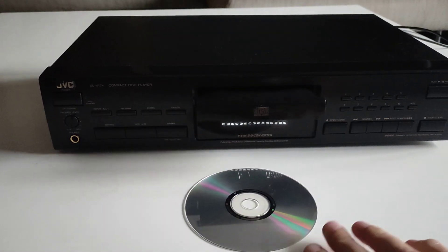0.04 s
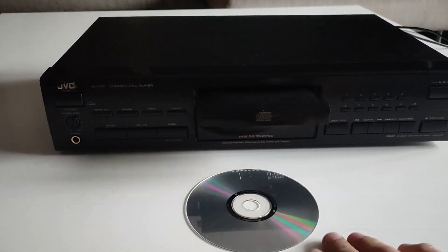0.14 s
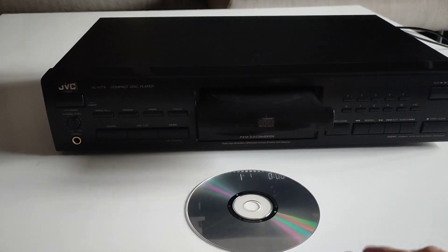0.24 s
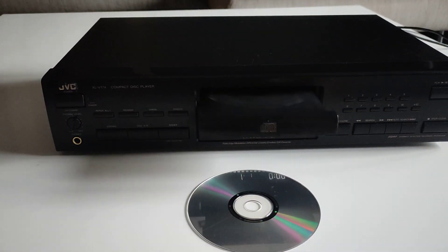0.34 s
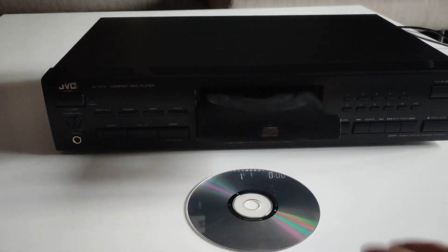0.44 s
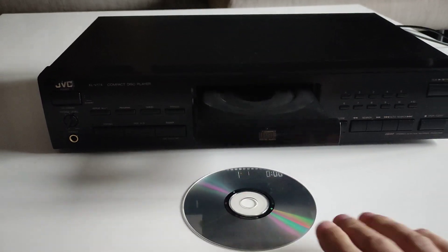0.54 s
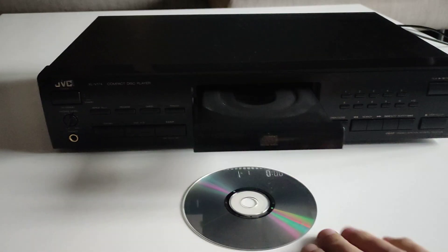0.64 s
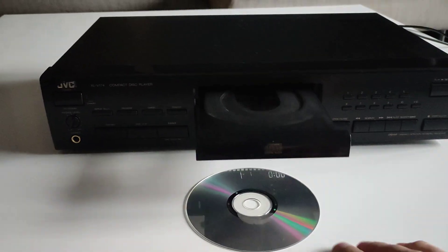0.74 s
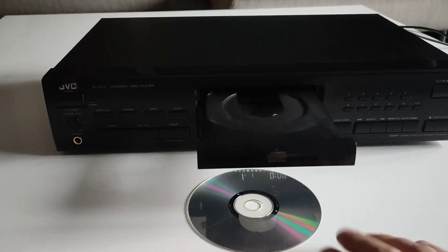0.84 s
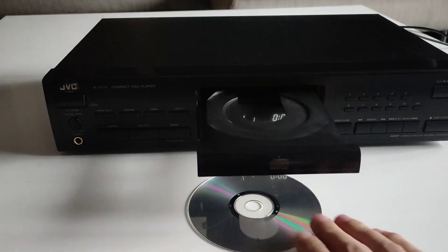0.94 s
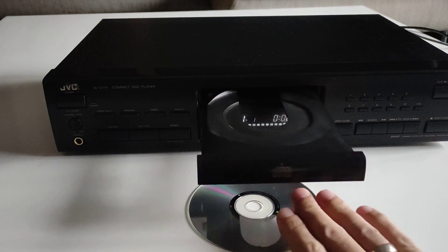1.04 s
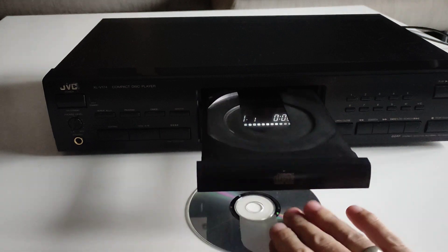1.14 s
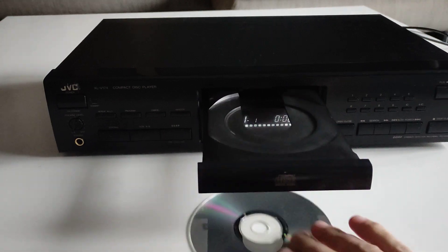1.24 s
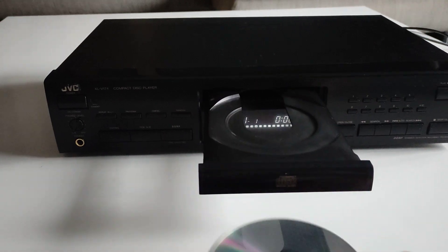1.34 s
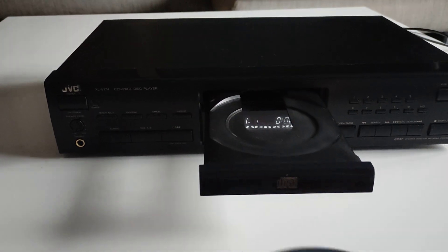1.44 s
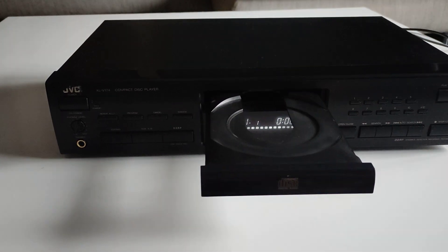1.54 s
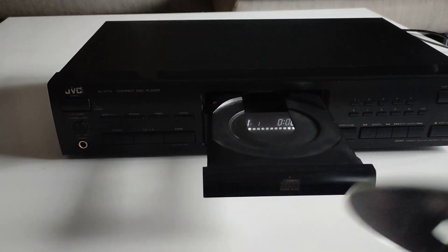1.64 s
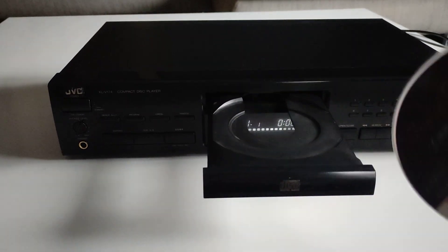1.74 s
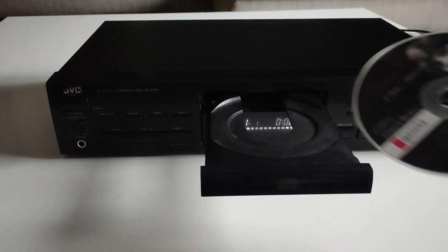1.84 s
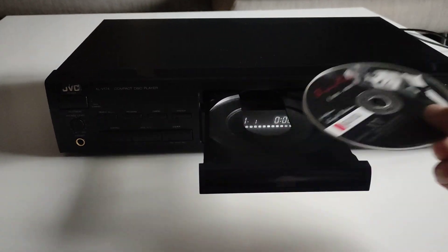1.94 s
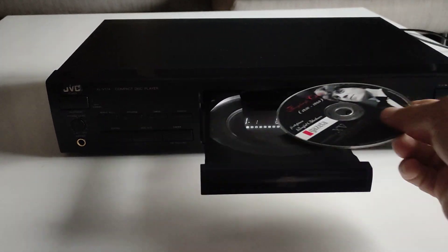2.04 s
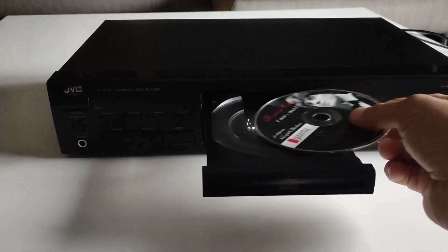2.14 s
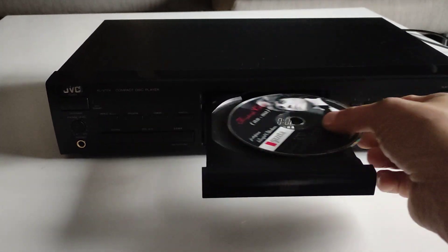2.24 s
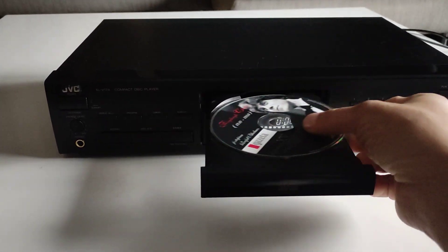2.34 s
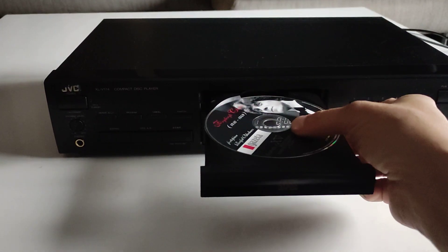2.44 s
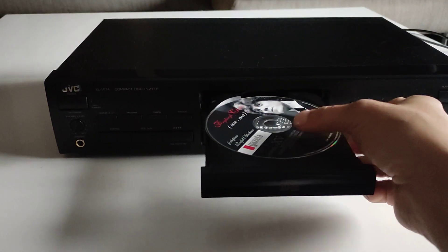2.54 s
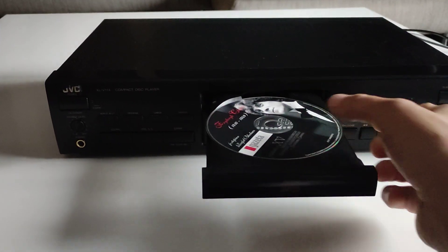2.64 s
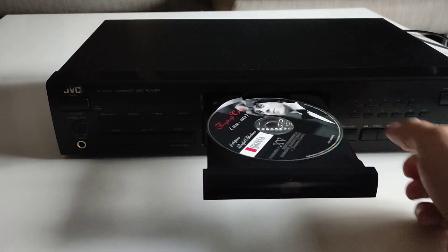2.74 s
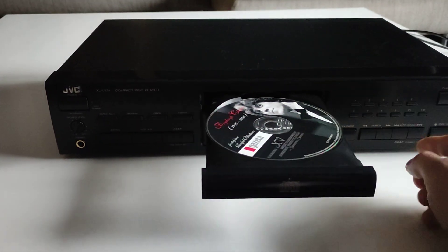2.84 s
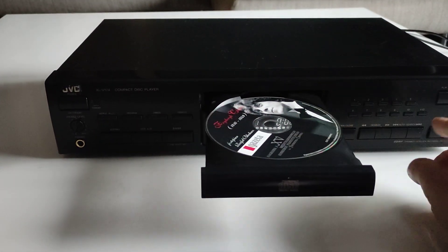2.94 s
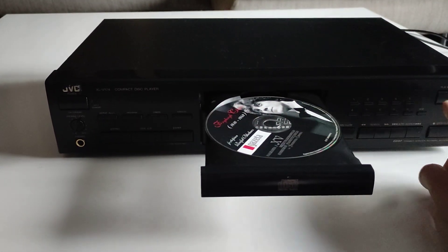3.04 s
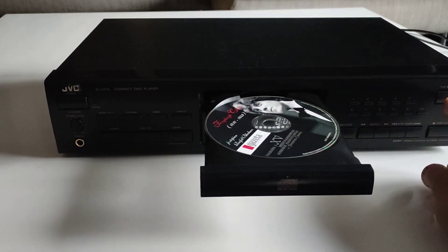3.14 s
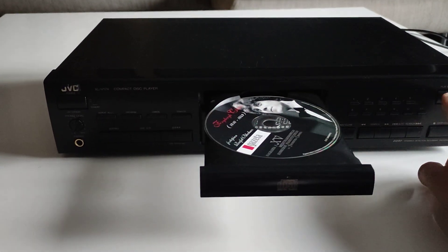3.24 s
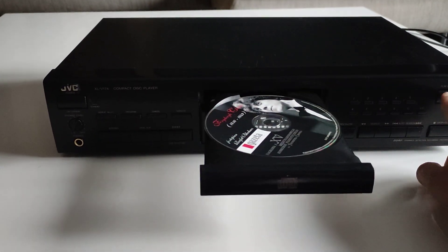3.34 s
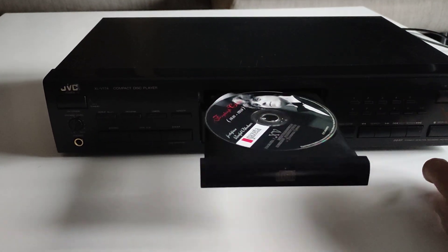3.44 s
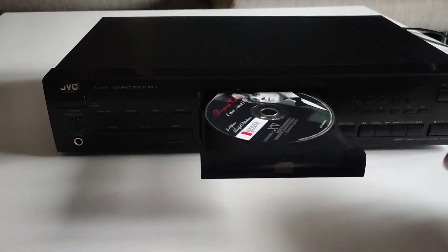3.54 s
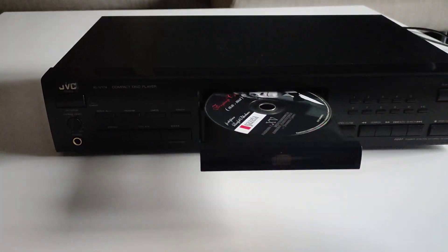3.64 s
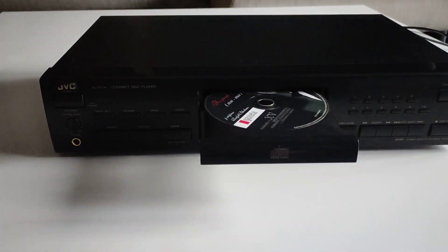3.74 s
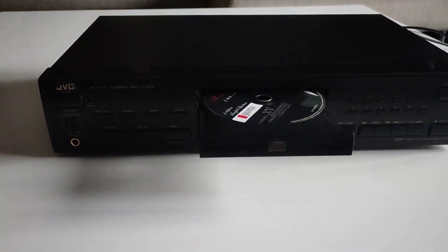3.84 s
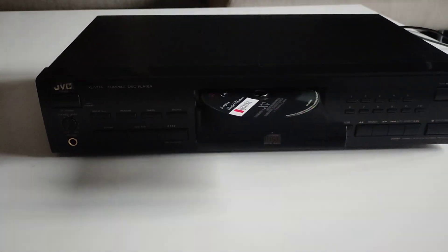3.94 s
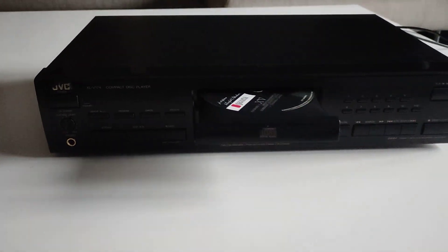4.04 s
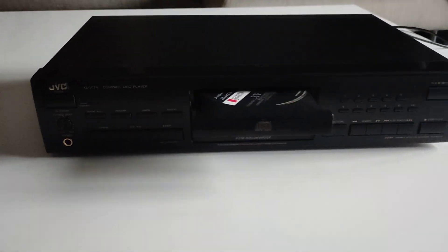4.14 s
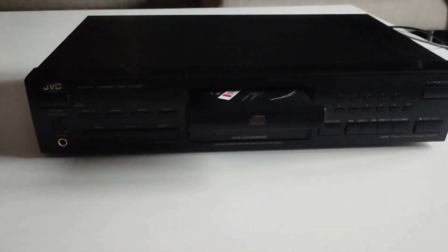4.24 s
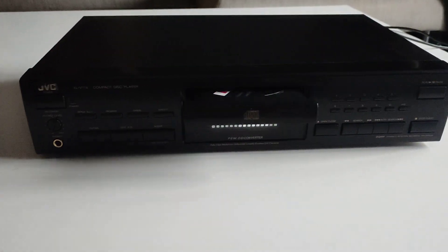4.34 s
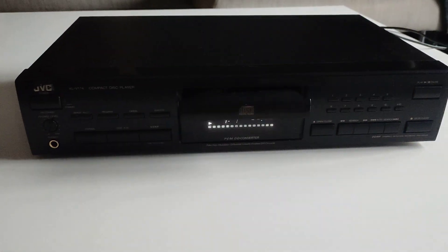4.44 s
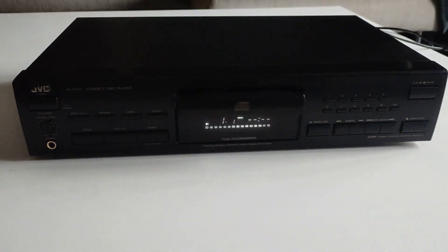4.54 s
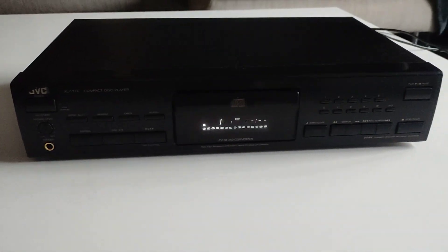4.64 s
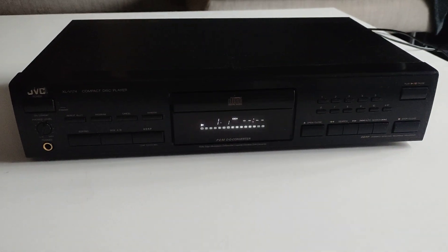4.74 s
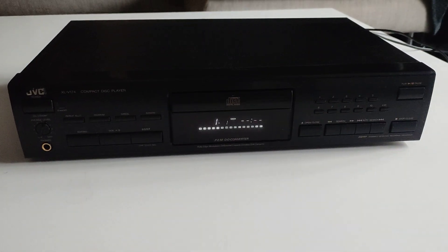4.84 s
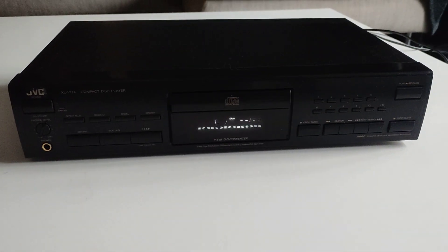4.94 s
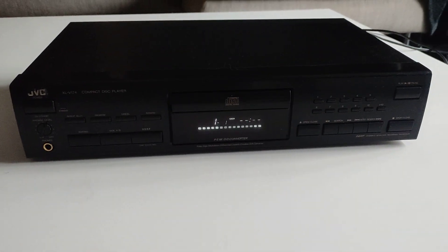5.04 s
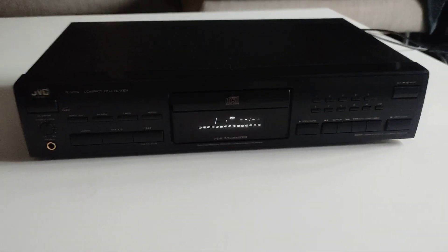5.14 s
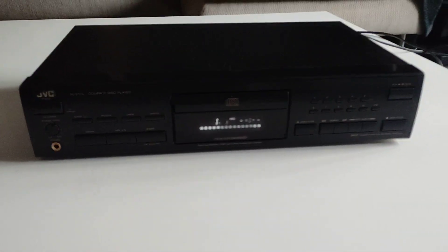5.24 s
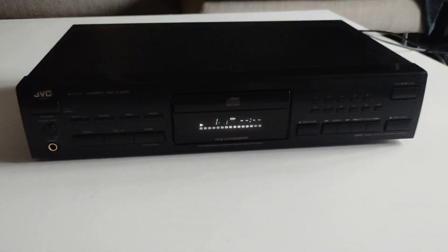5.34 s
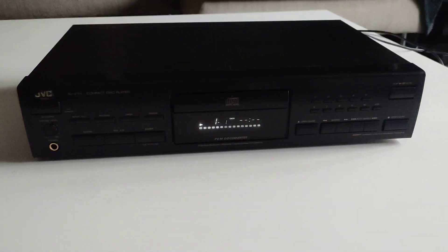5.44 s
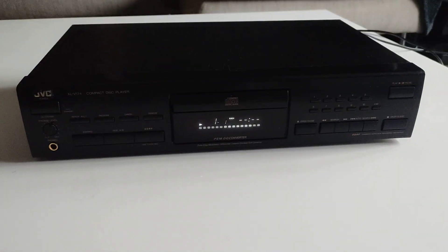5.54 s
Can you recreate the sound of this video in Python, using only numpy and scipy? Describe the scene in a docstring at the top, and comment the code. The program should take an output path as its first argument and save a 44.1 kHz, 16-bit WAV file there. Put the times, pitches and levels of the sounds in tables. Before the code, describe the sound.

A low geared whir with brushy hiss opens a plastic tray, ending in a click. A hand scrapes a disc off the table with tiny edge ticks, drops it with one hard hollow clack, and adjusts it with a lighter clatter. The tray whirs shut a little higher and more rattly, several latch clicks follow, then soft regular ticking. Close microphones, slight room reverberation, faint air and hum.

```python
"""A small motor drives out the tray of a disc player: gear teeth hum in the case, brushes hiss, plastic clicks.
A hand slides a disc off the table, a rub of dense grains and short edge rings, and drops it on the tray: a
blow that rings the tray, cracks and thumps; it then nudges the disc home. The motor pulls the tray in and the
clamp locks; the lens drive ticks as clicks of noise, and last the spindle whispers as resonant noise.
A close stereo pair hears it all over the air and hum of a quiet room."""
import sys
import numpy as np
from scipy import signal
from scipy.fft import rfft, irfft, next_fast_len
from scipy.io import wavfile

SR = 44100
rng = np.random.default_rng(int(sys.argv[2]) if len(sys.argv) > 2 else 0)


def bounce(signal):
    """Save signal as a 16-bit WAV file at the path given by the first command-line argument."""
    frames = np.transpose(np.atleast_2d(signal))
    limited = np.clip(frames, -1, 1)
    pcm = np.round(limited * 32767).astype(np.int16)
    wavfile.write(sys.argv[1], SR, pcm)


N = 246954

# Source levels are ahead of the mix in scene(); levels in spectra are relative.
# Room air spectrum: f/Hz, level/dB per Hz
AIR_SPECTRUM = [(20, -38), (60, -18.5), (100, -6.5), (160, -8.5), (200, -5), (300, -10), (1440, -23),
                (14700, -37), (16000, -43.5)]
# Left-right likeness of the room air: f/Hz, likeness (0-1)
AIR_LIKENESS = [(60, 0.27), (240, 0.4), (1000, 0.031)]
AIR_DB = -62
HUM_HZ, HUM_DB = 201.5, -66.5  # transformer in the player

# Left-right likeness of wide sources and of the room tail: f/Hz, likeness (0-1)
WIDE_LIKENESS = [(100, 1), (300, 0.93), (700, 0.71), (1400, 0), (3000, 0.037)]
# Decay of the room tail: f/Hz, t60/s
ROOM_T60 = [(200, 0.67), (800, 0.43), (3000, 0.38), (10000, 0.28)]
# Reflections off table and front panel: t/s, left level/dB, right level/dB
REFLECTIONS = [(.0023, -15, -32)]
ROOM_DB = -3
# Share of a pan that the housing casts: f/Hz, share
SHADING = [(300, 0.015), (700, 0.2), (2000, 1.54), (8000, 2.19), (13000, 0.047)]
# Sends to the room: the case keeps the mechanism from it; edge and rub are close to the microphones; the disc
# blows fill it most
PLAYER_WET_DB, EDGE_WET_DB, DISC_WET_DB = -9, -8, -3
MIC_LOW_HZ = 153  # the capsules lose the deep bass of near sources
CUTOFF_HZ = 16650  # stop-band edge of the top cut

# Lens drive tick spectrum: f/Hz, level/dB per Hz
SEEK_SPECTRUM = [(1500, -2), (6000, -6), (12000, -18.5)]
SEEK_FROM_S, SEEK_PERIOD_S, SEEK_DB, SEEK_ACCENT_DB = 5.125, .0329, -64, 4.5
# Spindle whisper: t/s, level/dB
SPIN_UP = [(5.54, -101), (5.565, -56), (5.62, -69)]
SPIN_HZ, SPIN_WIDTH_HZ, SPIN_DB = 1940, 140, -11  # its resonance, against the whisper's hiss

# Disc sliding over table and tray: start t/s, full t/s, let-go t/s, bright level/dB, dull level/dB
STROKES = [(1.12, 1.39, 1.471, -38, -60), (1.44, 1.462, 1.478, -52, -45), (1.943, 2.33, 2.39, -52, -54),
           (2.455, 2.462, 2.48, -39, -41), (2.47, 2.497, 2.536, -31, -30)]
# Bright and dull rub spectra: f/Hz, level/dB per Hz
RUB_BRIGHT = [(3500, -10), (5800, -7.5), (8140, 9.5), (10600, 6.5), (15200, -21.5), (16500, -50)]
RUB_DULL = [(700, -13), (1400, -4), (2000, -3.5), (3200, -4.5), (7000, -10)]
SWELL_POWER, LET_GO_DB_PER_S = 2.5, 900  # a stroke swells as a power of time, then stops short
# Disc edge leaving the table, a finger or the tray rim:
# t/s, peak level/dB, f/Hz, treble crack level/dB, t60/s of each of two chained resonators
EDGE_TICKS = [(1.467, -38, 1993, -50, 0.016), (1.501, -41, 3090, -30.5, 0.006),
              (1.502, -40.5, 4550, -60, 0.0074), (1.5425, -43, 2400, -38, 0.0041),
              (1.5685, -40, 2416, -34.5, 0.007), (1.5708, -45.5, 2970, -55, 0.014),
              (2.399, -45, 2990, -70, 0.034), (2.522, -29, 916, -68, 0.049)]

# Disc meeting tray: t/s, peak level/dB, treble crack level/dB, thump level/dB, favoured f/Hz
DISC_BLOWS = [(2.134, -41, -42, -55, 910), (2.163, -7, -16, -16, 887), (2.216, -31, -25.5, -48, 860),
              (2.453, -29, -23.5, -36, 680), (2.469, -34.5, -49, -36, 680), (2.489, -23.5, -37, -57, 920),
              (2.52, -33.5, -29, -27, 830)]
# Stops, switches and clamp: t/s, peak level/dB, treble crack level/dB, thump level/dB, favoured f/Hz
CLICKS = [(0.747, -39.5, -41, -35.5, 2000), (1.2265, -41, -42, -49, 1710), (1.23, -30.5, -18.5, -36, 816),
          (3.38, -24, -18.5, -49, 1017), (3.434, -34, -33.5, -43, 1840), (4.706, -36, -29.5, -37, 1255),
          (4.727, -51, -35, -41, 860), (4.76, -30, -50, -30, 696), (4.787, -36, -45, -30.5, 1270),
          (4.824, -37, -62, -32.5, 1270), (4.903, -30.5, -35, -34.5, 1750),
          (4.933, -21.5, -25.5, -31.5, 1430), (4.953, -19, -34.5, -27.5, 1960),
          (5.0, -35.5, -51, -59, 1370), (5.024, -36, -36, -41, 1330), (5.034, -45, -35.5, -35, 2250)]
# Modes of the tray and of the mechanism's parts: f/Hz, level/dB
TRAY_MODES = [(330, -0.5), (680, -5), (840, -5), (915, -9), (1065, -6), (1280, -14), (1600, 4), (2000, 0.5),
              (2400, 6.5), (3100, -12)]
PART_MODES = [(680, -4), (860, -6), (1270, 0.5), (1700, 1.5), (2030, -2.5), (2300, -3), (2900, -8)]
PART_CYCLES, TRAY_CYCLES = 30, 14  # a ringing mode falls 60 dB in this many cycles
# dB lost per octave from the favoured pitch in the softest blow; a sharp crack strikes all modes
PART_FAVOUR_DB, TRAY_FAVOUR_DB = 28, 20
# Case thumping on the table: f/Hz, level/dB, t60/s
THUMP_MODES = [(244, 18.5, 0.26), (288.5, 15, 0.18), (335.5, 0.5, 0.13)]
# Plastic crack spectrum: f/Hz, level/dB per Hz
CRACK_SPECTRUM = [(1500, -4.5), (3000, 2), (5800, -1.5), (8400, 0.5), (12000, -3), (16000, -13)]

# Motor runs: t/s, tooth mesh f/Hz, mesh tone level/dB, openness of the sound (0-1)
OPENING = [(0.0, 249, -61.5, 0), (.3, 258.5, -41.5, 0.4), (.6, 268, -64.5, 0.4), (.8, 268.7, -50.5, 0.49),
           (.96, 260.9, -50.5, 0.65), (1.1, 259.8, -39, 0.52), (1.25, 257.6, -44, 0.74),
           (1.44, 233, -70, 0.66)]
CLOSING = [(3.39, 145.5, -57, 0.88), (3.56, 256.8, -40.5, 0.65), (3.7, 275.3, -47, 0.47),
           (4.05, 278.7, -42.5, 0.35), (4.18, 285.3, -38.5, 0.27), (4.72, 286.0, -38.5, 0.016),
           (4.82, 238.2, -38, 0), (5.02, 226.5, -44.5, 0.44), (5.1, 216, -50.5, 0.4)]
# Low case resonances: f/Hz, width/Hz, level/dB
CASE_MODES = [(101.7, 13.4, -7.5), (206.8, 44, -2), (235, 46.2, 1.5), (295.2, 30, -0.5)]
# Tray and gear resonances: f/Hz, width/Hz, level/dB
GEAR_MODES = [(686, 124, 6), (816, 84, 11.5), (1051, 23, 11.5), (1280, 1600, -15), (1840, 1170, 1.5),
              (2400, 4800, -8)]
# Sliding rails spectrum: f/Hz, level/dB per Hz
RAIL_SPECTRUM = [(300, -44), (600, -13), (1500, -3), (3000, -18.5), (8000, -68)]
# Brush hiss spectra while opening and closing: f/Hz, level/dB per Hz
BRUSH_OUT = [(3000, -11.5), (5000, 2), (5800, -12), (8200, 3), (9300, -1), (10700, 4), (13800, -1.5),
             (16000, -55)]
BRUSH_IN = [(3000, -12.5), (5000, 0), (5800, -8.5), (8200, -1), (9500, -4), (11000, 3.5), (12500, 3.5),
            (16000, -25)]
# Mesh overtones: multiple, level/dB against the gear rattle, gain/dB at full openness
OVERTONES = [(3, -8, 0), (4, -15, 0), (5, -15, 0), (7, -36, 39)]
WHINE_OUT_DB, WHINE_IN_DB = -2, 4  # overtone trim while opening, closing
BRUSH_PER_MESH, BRUSH_DEPTH = .7, .3  # commutator beats per tooth contact, depth of the gating
# Rumble, rattle, hiss ahead of trims: (level/dB at openness 0, level/dB at openness 1)
CASE_DB, GEAR_DB, HISS_DB = (-45.5, -47), (-50.5, -51), (-61, -45.5)
HISS_PER_SPEED_DB = 47  # hiss gained per tenfold speed; overtones gain twice as much
CHATTER_PER_S, CHATTER_DB = 400, -30.5  # random taps into each mode: rate, dB against the gear rattle
CLAMP_DB, CLAMP_REACH = 10, 0.039  # parts tap harder by this many dB while openness is below this share
PINION_TEETH, PINION_AT_S = 17, 4.369  # an off-centre pinion shakes loose parts once a turn, as here
COAST_DB_PER_S = 177  # rumble, rattle, hiss and overtones die away over the last leg of a run


def from_db(db):
    """Decibels to gain."""
    return 10 ** (np.asarray(db) / 20)


def rms_one(x):
    """Scale to unit rms."""
    return x / np.sqrt(np.mean(x ** 2) + 1e-20)


def in_time(rows):
    """Columns of a curve at every sample, after a gate that is open only along the curve."""
    s, *columns = np.transpose(rows)
    t = np.arange(N) / SR
    inside_s = s[-1] - t
    if s[0]:  # a curve from time zero needs no fade-in
        inside_s = np.minimum(t - s[0] + .002, inside_s)
    gate = np.clip(inside_s / .01, 0, 1)
    return [gate] + [np.interp(t, s, column) for column in columns]


def at_hz(points, hz):
    """Read a spectrum table on a log-frequency axis."""
    table_hz, values = np.array(points)[:, 0], np.array(points)[:, 1]
    return np.interp(np.log(np.maximum(hz, 1)), np.log(table_hz), values)


def coloured(x, spectrum):
    """Filter a signal by a spectrum table."""
    size = next_fast_len(x.shape[-1])
    gain = from_db(at_hz(spectrum, np.arange(size // 2 + 1) * SR / size))
    return irfft(rfft(x, size) * gain, size)[..., :x.shape[-1]]


def stereo_noise(likeness, length):
    """White noise pair whose channels are as alike as the table says."""
    size = next_fast_len(length)
    alike = np.clip(at_hz(likeness, np.arange(size // 2 + 1) * SR / size), 0, 1)
    mid, side = rfft(rng.standard_normal((2, size)))
    mid = np.sqrt(.5 + .5 * alike) * mid
    side = np.sqrt(.5 - .5 * alike) * side
    return irfft(mid + side * [[1], [-1]], size)[:, :length]


def drift(rate):
    """Slow random wander of spread 1: noise low-passed near rate in Hz, made at every 40th sample."""
    r = np.exp(-80 * np.pi * rate / SR)
    slow = signal.lfilter([1], [1, -2 * r, r * r], rng.standard_normal(N // 40 + 2002))[2000:]
    return np.interp(np.arange(N) / 40, np.arange(len(slow)), rms_one(slow))


def ring(x, hz, t60):
    """Two-pole resonator: a unit click sets a decaying sine of height 1 ringing."""
    r, w = from_db(-60 / (t60 * SR)), 2 * np.pi * hz / SR
    return signal.lfilter([0, np.sin(w)], [1, -2 * r * np.cos(w), r * r], x + 1e-18)


def resonances(x, peaks):
    """Parallel resonances of given width, signs alternating; rms 1."""
    out = 0
    for k, (hz, width, level_db) in enumerate(peaks):
        r = np.exp(-np.pi * max(width, 5) / SR)
        poles = [1, -2 * r * np.cos(2 * np.pi * hz / SR), r * r]
        gain = (-1) ** k * from_db(level_db) * (1 - r * r)
        out = out + gain * signal.lfilter([1, 0, -1], poles, x)
    return rms_one(out)


def grains(per_s, spread_db):
    """Dense random clicks of uneven size and either sign."""
    sizes = from_db(spread_db * np.minimum(rng.exponential(1, N), 5)) * rng.choice([-1, 1], N)
    return sizes * (rng.random(N) < per_s / SR)


def placed(x, pan_db, lag):
    """Let the left channel lag by some samples; the housing shades one side, hardly in the bass."""
    left, right = x * np.ones((2, 1))
    left = coloured(left, [(hz, share * pan_db / 2) for hz, share in SHADING])
    right = coloured(right, [(hz, -share * pan_db / 2) for hz, share in SHADING])
    return np.array([np.interp(np.arange(N) - lag, np.arange(N), left), right])


def quiet():
    """Room air as coloured noise, and a transformer hum wavering in pitch and level."""
    air = rms_one(coloured(stereo_noise(AIR_LIKENESS, N), AIR_SPECTRUM))
    air = air * from_db(AIR_DB + 1.0 * drift(1.0))
    hum_phase = 2 * np.pi * np.cumsum(HUM_HZ * (1 + .01 * drift(6))) / SR
    return air + from_db(HUM_DB + 4 * drift(5)) * np.sin(hum_phase)


def room(x):
    """Table and front panel reflect within a few ms, beside a noise tail that dies band by band."""
    t = np.arange(round(.7 * SR)) / SR
    noise, tail = stereo_noise(WIDE_LIKENESS, len(t)), 0
    edges = 60 * 2.0 ** np.arange(9)  # octave bands
    for low, high in zip(edges, edges[1:]):
        top = high * (1.2 if high > 9000 else 1)
        band = signal.sosfilt(signal.butter(2, [low, top], "band", fs=SR, output="sos"), noise)
        decay = from_db(-60 * t / at_hz(ROOM_T60, np.sqrt(low * high)))
        tail = tail + band * decay * np.clip(t / 0.0067, 0, 1)
    echo = from_db(ROOM_DB) * tail / np.sqrt(np.sum(tail ** 2) / 2)
    for s, left_db, right_db in REFLECTIONS:
        echo[:, round(s * SR)] += from_db([left_db, right_db])
    return signal.fftconvolve(x.mean(axis=0, keepdims=True), echo, axes=1)[:, :N]


def spindle():
    """The disc starts to turn behind the closed front: a hiss plus one resonance of the same noise."""
    gate, level_db = in_time(SPIN_UP)
    noise = rng.standard_normal(N)
    hiss = rms_one(coloured(noise, BRUSH_OUT))
    body = from_db(SPIN_DB) * resonances(noise, [(SPIN_HZ, SPIN_WIDTH_HZ, 0)])
    return gate * from_db(level_db) * (hiss + body)


def seeking():
    """The lens drive ticks faintly and evenly in short noise; every fourth tick's accent grows from none."""
    out, t = np.zeros(N), np.arange(round(.03 * SR)) / SR
    for step in range(13):
        at = round((SEEK_FROM_S + step * SEEK_PERIOD_S) * SR)
        accent_db = (step % 4 == 0) * SEEK_ACCENT_DB * step / 8
        tick = rms_one(coloured(rng.standard_normal(len(t)), SEEK_SPECTRUM)) * np.exp(-t / 0.006)
        out[at:at + len(t)] += from_db(SEEK_DB + accent_db) * tick
    return out


def rubbing():
    """Dust and edge catch in dense grains under each stroke."""
    t, bright, dull = np.arange(N) / SR, 0, 0
    for start_s, full_s, end_s, bright_db, dull_db in STROKES:
        swell = np.clip((t - start_s) / (full_s - start_s), 0, 1) ** SWELL_POWER
        shape = swell * from_db(-LET_GO_DB_PER_S * np.maximum(t - end_s, 0))
        bright = bright + from_db(bright_db) * shape
        dull = dull + from_db(dull_db) * shape
    catch = from_db(1.8 * drift(40))
    bright_rub = rms_one(coloured(catch * grains(12000, 3.2), RUB_BRIGHT))
    dull_rub = rms_one(coloured(catch * grains(2000, 3.5), RUB_DULL))
    return bright * bright_rub + dull * dull_rub


def burst(length_s):
    """A contact chatters for a few ms: noise that builds up quickly and dies."""
    t = np.arange(round(.05 * SR)) / SR
    return rng.standard_normal(len(t)) * np.exp(-t / length_s) * (1 - np.exp(-t / 0.00059))


def crackle(length_s, size):
    """The bright snap of hard plastic on plastic; contact builds up over a ms."""
    t = np.arange(size) / SR
    snap = coloured(rng.standard_normal(size), CRACK_SPECTRUM)
    return snap * np.exp(-t / length_s) * (1 - np.exp(-t / 0.0007))


def ticks():
    """The disc edge rings briefly at one pitch, with a small crack."""
    out = np.zeros(N)
    for s, peak_db, hz, crack_db, t60 in EDGE_TICKS:
        note = ring(ring(np.r_[burst(0.003), np.zeros(SR // 10)], hz, t60), hz, t60)
        crack = crackle(0.0054, len(note))
        at = round(s * SR)
        out[at:at + len(note)] += from_db(peak_db) * note / np.abs(note).max()
        out[at:at + len(note)] += from_db(crack_db) * crack / np.abs(crack).max()
    return out


def blows(events, modes, cycles, favour_db, contact_s, crack_s):
    """Each blow chatters into modes near its favoured pitch, cracks in the treble and thumps the case."""
    out = np.zeros(N)
    pad = np.zeros(round(.3 * SR))
    for s, peak_db, crack_db, thump_db, favoured_hz in events:
        body = 0
        slope_db = favour_db / (1 + from_db(crack_db - peak_db))
        for hz, level_db in modes:
            reach_db = level_db - slope_db * abs(np.log2(hz / favoured_hz))
            body = body + from_db(reach_db) * ring(np.r_[burst(contact_s), pad], hz, cycles / hz)
        push = np.gradient(np.gradient(np.hanning(130) ** 2))  # a soft 3 ms push and rebound
        push = np.r_[push, np.zeros(len(body) - len(push))]
        thump = sum(from_db(level_db) * ring(push, hz, t60) for hz, level_db, t60 in THUMP_MODES)
        crack = crackle(crack_s, len(body))
        parts = (peak_db, body), (thump_db, thump), (crack_db, crack)
        sound = sum(from_db(level_db) * part / np.abs(part).max() for level_db, part in parts)
        at = round(s * SR)
        out[at:at + len(sound)] += sound[:N - at]
    return out


def motor(run, brush_colour, hiss_db, rattle_db, whine_db, shake_db):
    """Teeth mesh once a turn of the phase: a tone, overtones and uneven knocks; brushes gate a hiss. The more
    open the sound, the more hiss escapes and the less the case rumbles."""
    gate, mesh_hz, tone_db, out = in_time(run)
    coast_db = -COAST_DB_PER_S * np.maximum(np.arange(N) / SR - run[-2][0], 0)
    case_db, gear_db, brush_db = (coast_db + shut + (wide - shut) * np.clip(out, 0, 1)
                                  for shut, wide in (CASE_DB, GEAR_DB, HISS_DB))
    turns = np.cumsum(mesh_hz * (1 + 0.003 * drift(28))) / SR
    speed_db = HISS_PER_SPEED_DB * np.log10(mesh_hz / mesh_hz.max())

    tone = np.sqrt(2) * from_db(tone_db + 1.67 * drift(9.0)) * np.sin(2 * np.pi * turns)
    overtones = 0
    for multiple, level_db, gained_db in OVERTONES:
        height_db = gear_db + whine_db + level_db + gained_db * out + 2 * speed_db + 2.5 * drift(12)
        wave = np.sin(2 * np.pi * round(multiple) * turns)
        overtones = overtones + np.sqrt(2) * from_db(height_db) * wave

    knocks = (np.diff(np.floor(turns), prepend=0) > 0) * (1 + .5 * rng.standard_normal(N))
    slide = stereo_noise(WIDE_LIKENESS, N)  # the long tray sounds from many places at once
    case = from_db(case_db + 0.5 * drift(0.93)) * resonances(slide, CASE_MODES)
    rails = rms_one(coloured(np.array([grains(2500, 4.8), grains(2700, 1.7)]), RAIL_SPECTRUM))
    rattle = rms_one(resonances(rms_one(knocks) * 0.08 + slide, GEAR_MODES) + 0.87 * rails)
    clamp_db = CLAMP_DB * np.clip(1 - out / CLAMP_REACH, 0, 1)
    wander_db = 0.74 * drift(24.0) + 1.54 * drift(25)
    rattle = from_db(gear_db + rattle_db + clamp_db / 2 + wander_db) * rattle

    # The pinion's shake is strongest at openness 0
    pinion = np.cos(2 * np.pi * (turns - turns[round(PINION_AT_S * SR)]) / PINION_TEETH)
    shake = from_db(shake_db * np.clip(1 - out, 0, 1) * pinion)
    chatter = 0
    for hz, level_db in PART_MODES:
        taps = shake * rms_one(grains(CHATTER_PER_S, 4.1))
        chatter = chatter + from_db(level_db) * ring(taps, hz, PART_CYCLES / hz)
    chatter = from_db(gear_db + CHATTER_DB + clamp_db) * chatter

    beat = 1 + BRUSH_DEPTH * np.sin(2 * np.pi * BRUSH_PER_MESH * turns)
    hiss = rms_one(coloured(beat * stereo_noise(WIDE_LIKENESS, N), brush_colour))
    hiss = from_db(brush_db + hiss_db + clamp_db / 2 + speed_db + 1.0 * drift(13.0)) * hiss
    return gate * (tone + overtones + case + rattle + chatter + hiss)


def scene():
    """All sources placed in stereo, the room around them and the quiet below."""
    rub = placed(rubbing(), -6.0, 3.05)
    edge = placed(ticks(), -7.5, 2.7)
    disc = blows(DISC_BLOWS, TRAY_MODES, TRAY_CYCLES, TRAY_FAVOUR_DB, contact_s=0.013, crack_s=0.0044)
    disc = placed(disc, -9.5, 0.21)
    clicks = blows(CLICKS, PART_MODES, PART_CYCLES, PART_FAVOUR_DB, contact_s=0.012, crack_s=0.0059)
    opening = motor(OPENING, BRUSH_OUT, hiss_db=-1.0, rattle_db=-1.0, whine_db=WHINE_OUT_DB, shake_db=3.0)
    closing = motor(CLOSING, BRUSH_IN, hiss_db=3.5, rattle_db=1.4, whine_db=WHINE_IN_DB, shake_db=11.0)
    player = placed(opening + closing + spindle() + seeking() + clicks, -2.94, 0.95)
    direct = from_db(-4.5) * (player + edge + rub + disc)
    send = from_db(EDGE_WET_DB) * (edge + rub) + from_db(PLAYER_WET_DB) * player + from_db(DISC_WET_DB) * disc
    bass_cut = signal.butter(2, MIC_LOW_HZ, "high", fs=SR, output="sos")
    return signal.sosfilt(bass_cut, direct + room(send)) + quiet()


def record(dry):
    """A steep low-pass cuts the top."""
    return signal.sosfilt(signal.cheby2(12, 70, CUTOFF_HZ, fs=SR, output="sos"), dry)


dry = scene()
out = record(dry)
bounce(out)
```